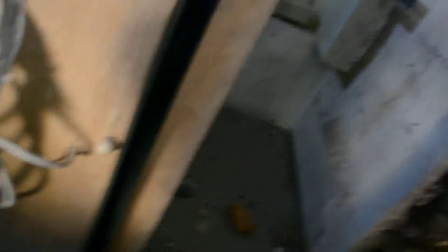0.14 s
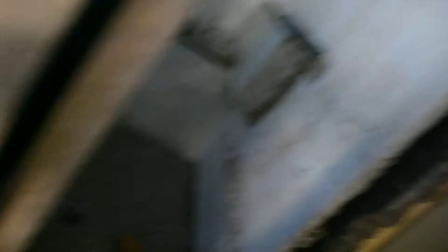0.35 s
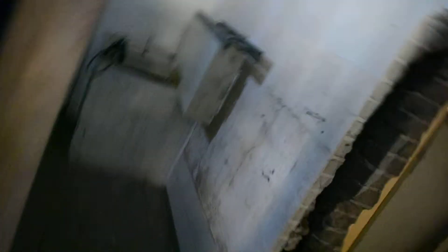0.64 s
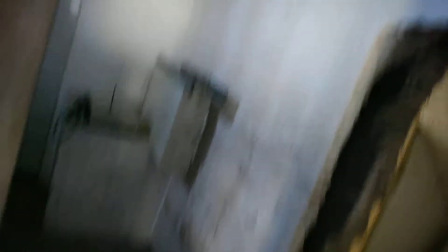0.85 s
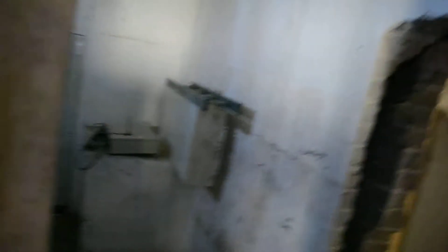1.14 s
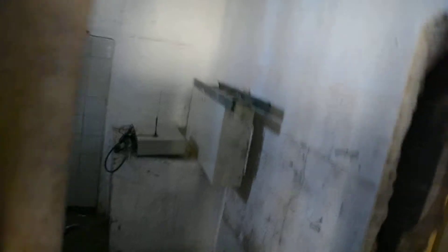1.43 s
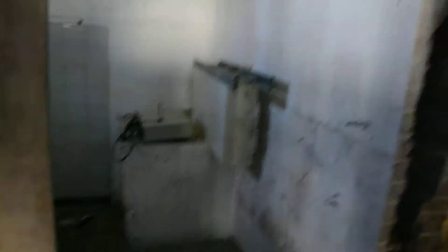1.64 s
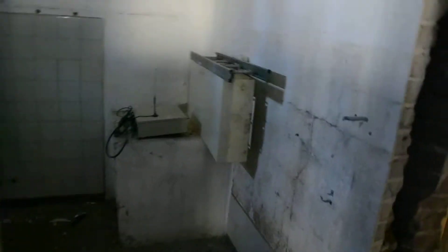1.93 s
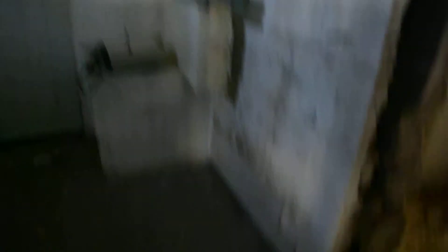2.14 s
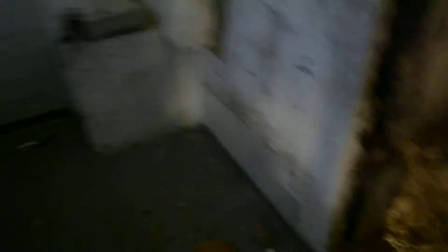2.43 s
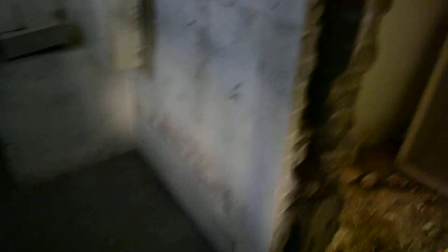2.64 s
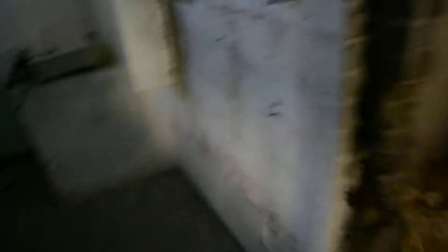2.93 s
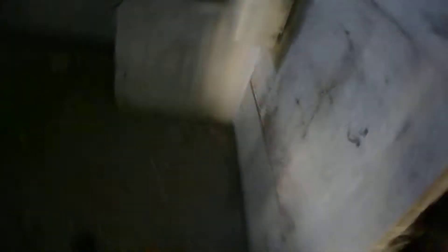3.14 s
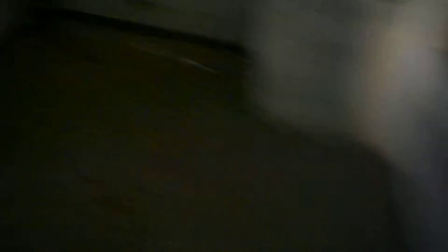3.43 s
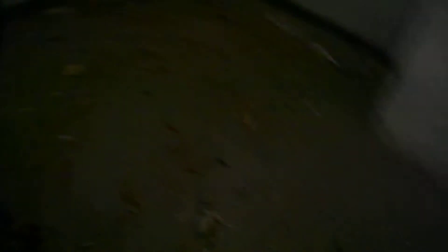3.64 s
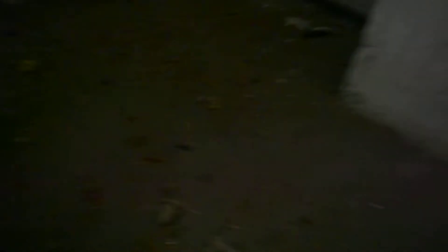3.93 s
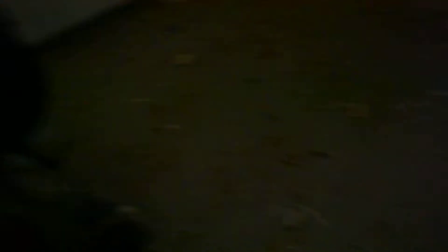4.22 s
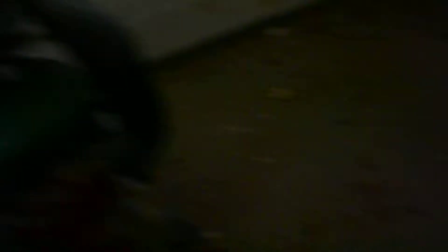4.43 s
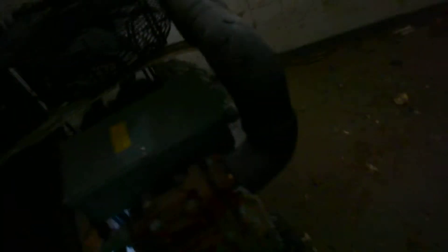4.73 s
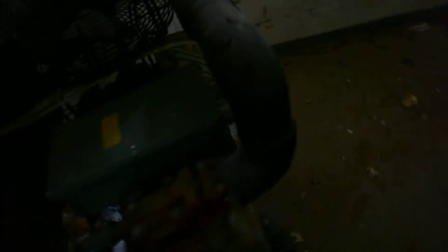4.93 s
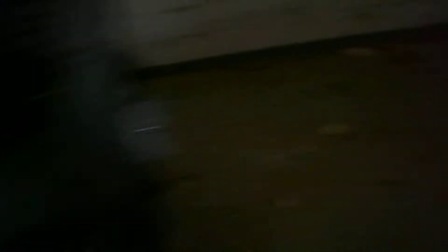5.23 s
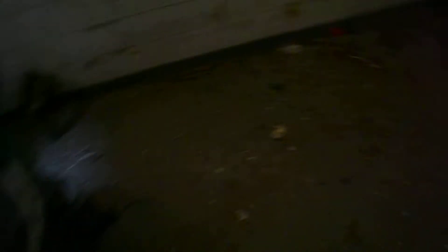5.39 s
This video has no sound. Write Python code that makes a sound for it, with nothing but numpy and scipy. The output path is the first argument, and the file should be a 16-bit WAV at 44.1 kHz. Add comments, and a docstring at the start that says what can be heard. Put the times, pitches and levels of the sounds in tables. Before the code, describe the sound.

Someone walks over grit and debris on a concrete floor. Light cracks lead into brisk crunches, snaps and small chinks, then stone knocks, and suddenly very loud crunches with heel thuds and a hollow ringing tumble. The bare walls answer with a short hard reverb. A lull follows, then a small knock and lighter scuffs; slightly dull handheld microphone, low steady air.

```python
"""The doorway of a small bare concrete room: someone steps through, soles crunching and scuffing over grit.
Noise and pitched cracks, coloured by pressure, make the crunch; short bursts ring broad humps as snaps and
knocks. Dying sines make the chinking metal, the ringing hollow piece and the heel thuds; slips rasp.
Random taps are the walls, whose answer swells as the walker enters and then sinks; steady air lies below."""
import sys
import numpy as np
from scipy import signal
from scipy.fft import rfft, irfft
from scipy.io import wavfile
from scipy.ndimage import uniform_filter1d

SR = 44100
rng = np.random.default_rng(int(sys.argv[2]) if len(sys.argv) > 2 else 0)


def persist_wave(psi):
    """Save psi, clipped to +-1, as 16-bit WAV."""
    counts = np.round(np.clip(psi, -1, 1) * 32767).astype(np.int16)
    wavfile.write(sys.argv[1], SR, np.atleast_2d(counts).T)


N = 245195
# All source levels are relative: the microphone colour comes after them.

# microphone response: f/Hz, level/dB
MIC = [(6500, -5), (7500, -6), (7950, -15), (8400, -4.5), (9500, -5.5), (10500, -11.5), (11400, -27)]


def gain_of(db):
    """Amplitude factor for a level in dB."""
    return 10 ** (np.asarray(db) / 20)


def evened(x):
    """Bring a signal to an RMS of 1."""
    return x / np.sqrt(np.mean(x ** 2) + 1e-20)


def read_curve(points, hz):
    """Read a frequency curve, straight between its points over log frequency."""
    f, value = np.transpose(points)
    return np.interp(np.log(hz + 1), np.log(f + 1), value)


def over_time(points, t):
    """Read a curve of (t/s, value) at the times t."""
    return np.interp(t, *np.transpose(points))


def add(mix, s, sound):
    """Mix a sound in at s seconds, cut at the end of the scene."""
    part = mix[round(s * SR):][:len(sound)]
    part += sound[:len(part)]


def ring(hz, db, t60, phase=0):
    """One dying mode: a sine that loses 60 dB in t60 seconds, cut after 1 s at most."""
    t = np.arange(int(SR * min(t60, 1))) / SR
    return gain_of(db - 60 * t / t60) * np.sin(2 * np.pi * hz * t + phase)


def softened(tone, rise_s):
    """Ramp the start of a tone in, as a contact that is not instant."""
    return tone * np.minimum(np.arange(len(tone)) / SR / rise_s, 1)


def slow_waver(samples):
    """Slow random movement with an RMS of 1: noise averaged twice over a window."""
    once = uniform_filter1d(rng.standard_normal(N), size=samples)
    return evened(uniform_filter1d(once, size=samples))


def hump(x, hz, width):
    """A broad two-pole resonance, width as a share of hz; output peak 1."""
    r = np.exp(-np.pi * width * hz / SR)
    out = signal.lfilter([1, 0, -1], [1, -2 * r * np.cos(2 * np.pi * hz / SR), r * r], x)
    return out / abs(out).max()


def swell(t, start, rise, fade, db):
    """Rise, then fade: returns the gain and how far the fade has gone (1 after one fade time)."""
    rise_bend, fade_db, fade_bend = 1.1, 35.5, 1.14  # fade_db is lost over one fade time
    up = np.clip((t - start) / max(rise, .001), 0, 1)
    gone = np.clip((t - start - rise) / max(fade, .01), 0, 3)
    gain = up ** rise_bend * gain_of(db - fade_db * gone ** fade_bend)
    return gain * (gone < 3), gone


def soles():
    """Pressure sets the crunch; fine grit lifts its treble, pebbles its middle, body weight its bass."""
    # spectrum of sole on grit: f/Hz, relative density/dB per Hz
    grit_curve = [(24, -69), (40, -73), (108, -37), (195, -2), (247, -6), (320, -1.5), (927, -3.5),
                  (1120, -2), (4010, -10), (5580, -15.5), (7240, -15), (10100, -17.5), (11300, -21.5),
                  (14700, -55), (22000, -120)]
    hz, t, z = signal.stft(grains(rate=1800., spread_db=2.0), SR, nperseg=512, noverlap=384)
    z /= np.sqrt((abs(z) ** 2).mean(1, keepdims=True)) + 1e-12  # flatten the grain spectrum
    fine_db, weight_db, pebbles_db = pressure(t)[1]

    high = np.clip(np.log2(hz / 2600 + 1e-9) / 0.84, 0, 1)[:, None]
    low = np.clip(np.log2(900 / (hz + 1)) / 2.09, 0, 1)[:, None]
    middle = np.exp(-(np.log2(hz / 2600 + 1e-9) / 0.66) ** 2)[:, None]  # pebbles clack around here
    colour_db = high * fine_db + low * weight_db + middle * pebbles_db
    shape = gain_of(read_curve(grit_curve, hz)[:, None] + colour_db)
    mid = (hz > 500) & (hz < 3000)
    shape /= np.sqrt((shape[mid] ** 2).sum(0))  # pressure then sets the level of this band

    patches = uniform_filter1d(rng.standard_normal(z.shape), size=5, axis=0)
    patches = uniform_filter1d(patches, size=14, axis=1)
    shape *= gain_of(1.6 * evened(patches))  # each bit of rubble favours other pitches for a moment
    crunch = signal.istft(z * shape, SR, nperseg=512, noverlap=384)[1][:N]
    step = np.arange(0, N, 32)
    force = np.sqrt(pressure(step / SR)[0])
    return np.interp(np.arange(N), step, force) * crunch


def grains(rate, spread_db):
    """Countless grains crack, each ringing in one of 24 bands, a few large, over a rubbing hiss."""
    # share of separate cracks in the crunch: t/s, power share/0-1
    crack_share = [(0, 0.85), (2.7, 0.76), (3.3, 0.21), (4.9, 0.02), (5.56, 0.64)]
    cracks = np.zeros(N)
    for hz in np.geomspace(120, 10500, 24):
        size = gain_of(spread_db * np.minimum(rng.exponential(1, N), 4))
        size *= rng.choice([-1, 1], N)
        chance = rate / 24 / SR * np.sqrt(hz / 1500)  # high bands crack more often
        train = size * (rng.random(N) < chance)
        band = signal.oaconvolve(train, ring(hz, 0, 31.0 / hz))[:N]
        cracks += evened(band) * np.sqrt(hz)
    share = np.clip(over_time(crack_share, np.arange(N) / SR), 0, 1)
    return np.sqrt(share) * evened(cracks) + np.sqrt(1 - share) * rng.standard_normal(N)


def pressure(t):
    """Power of all crunches together, and their colour mixed by each one's share of it."""
    # soles shifting lightly on the grit throughout: t/s, level/dB
    shuffle = [(0, -59), (.12, -61), (.45, -65), (.75, -61), (.99, -55.5), (1.07, -60), (1.35, -53),
               (1.8, -47.5), (2.3, -54), (2.75, -57), (3.15, -57.5), (3.9, -42), (4.12, -56), (4.3, -77),
               (4.85, -65), (4.91, -59.5), (5.2, -60), (5.56, -64.5)]
    # colour of that shifting: fine grit/dB, body weight/dB, pebbles/dB
    shuffle_colour = (0, 4, 0.34)
    # crunches and scuffs: start/s, rise/s, fade/s, pressure/dB, fine grit/dB, body weight/dB, pebbles/dB
    crunch_rows = [(.475, 0.011, 0.046, -54.5, -4, -11, -13), (.55, 0.052, 0.2, -61, -1, 11, 9),
                   (.672, .006, 0.24, -58, -2, 4, 0), (1.083, 0.0087, 0.18, -35, -2.5, -3, -2),
                   (1.119, 0.013, 0.011, -24, -12, -15, -7.5), (1.145, 0.014, 0.44, -44.5, 2.5, -3, 2),
                   (1.42, 0.082, 0.16, -42, 1.5, 4, -0.5), (1.52, 0.063, 0.21, -45.5, 8, 0, 11),
                   (1.69, 0.025, 0.16, -45, 5.5, -14, 0), (1.857, 0.056, 0.084, -37.5, 0, 7.5, 1),
                   (2.099, 0.015, 0.25, -42.5, -2, -1, -1), (2.452, 0.069, 0.17, -38.5, 1, 1, 5.5),
                   (2.579, 0.05, 0.097, -43, -2, -16, -9), (2.802, 0.0086, 0.2, -45.5, -5, -0.5, -4),
                   (2.94, 0.075, 0.11, -55, -6, -5, -9), (3.348, 0.032, 0.23, -18, 3, 1, 3),
                   (3.557, 0.031, 0.39, -16.5, 1, -20.5, 7.5), (3.63, 0.041, 0.32, -26, -3, -22, -11),
                   (3.786, 0.024, 0.19, -27.5, -12.5, -9, -16), (3.95, 0.021, 0.19, -49, 22, 0, -3),
                   (4.135, 0.017, 0.25, -56.5, 7.5, -5, -15), (4.25, 0.012, .12, -64.5, 20, -15, -11),
                   (5.003, 0.032, 0.29, -46.5, 10, 5.5, 5.5), (5.12, 0.025, 0.3, -47.5, 4.5, -20, 2.5),
                   (5.203, 0.0066, 0.085, -34.5, -9.5, -22, -0.5), (5.22, 0.038, 0.4, -42.5, 3.5, -5.5, 3)]
    dull_db = 16  # extra loss of the fine grit over one fade time
    power = gain_of(over_time(shuffle, t)) ** 2
    colour = power * np.array(shuffle_colour)[:, None]
    for start, rise, fade, db, fine_db, weight_db, pebbles_db in crunch_rows:
        gain, gone = swell(t, start, rise, fade, db)
        own_colour = np.array([fine_db - dull_db * gone, weight_db + 0 * t, pebbles_db + 0 * t])
        power = power + gain ** 2
        colour = colour + gain ** 2 * own_colour
    return power, colour / power


def snaps():
    """A break and its dying puff of splinters ring a broad resonance, with a bright edge."""
    # fragments snapping under a sole: t/s, resonance peak/dB, centre f/Hz, bright edge against it/dB
    snap_rows = [(0.197, -38.5, 3980, -18), (0.214, -39, 1880, -10), (0.275, -39, 2740, -14),
                 (0.349, -37, 1080, -2.5), (0.366, -32.5, 1310, -6), (0.385, -41, 1140, 2),
                 (0.437, -37, 1300, -4), (0.49, -37.5, 2020, 1), (0.58, -38.5, 603, -25),
                 (1.089, -26.5, 1240, -3), (1.127, -28, 880, -4), (1.159, -25, 930, -14),
                 (1.17, -15, 2820, -7), (1.195, -24, 1330, -16), (1.279, -26.5, 1260, -8),
                 (1.336, -34, 1210, 0), (1.398, -43.5, 3610, 10), (1.421, -29, 655, -6),
                 (1.438, -26.5, 633, 0), (1.529, -34, 636, 5), (1.558, -24.5, 990, -17),
                 (1.586, -25.5, 2700, 1.5), (1.625, -20.5, 1190, -28), (1.636, -23, 1190, -23),
                 (1.723, -26, 1050, 1.5), (1.77, -20.5, 1580, -9), (1.862, -26, 700, -24),
                 (1.906, -29.5, 910, -20), (1.915, -21.5, 850, -20), (1.943, -25.5, 620, -8),
                 (1.987, -29, 684, -1.5), (2.03, -29.5, 930, 2), (2.089, -26.5, 4020, -13),
                 (2.123, -31, 1030, 4), (2.2, -21.5, 2010, -30), (2.219, -22.5, 1030, -38),
                 (2.344, -41, 2200, 3), (2.363, -25, 990, -31), (2.39, -46, 840, 12),
                 (2.472, -27.5, 600, -22), (2.502, -25.5, 3600, -9), (2.519, -22, 703, 1),
                 (2.645, -26.5, 1470, -11), (2.724, -38.5, 694, 2), (2.803, -32.5, 1570, -32),
                 (2.976, -34, 423, -25), (3.448, -9.5, 1350, -24), (3.659, -10.5, 1860, 5.5),
                 (3.966, -37, 2050, 0), (5.29, -26, 1220, -8), (5.325, -27.5, 1050, -19),
                 (5.455, -37, 690, -27), (5.487, -37, 673, -6)]
    splinter_s = 0.0034  # the noise dies to about a third in this time
    out, t = np.zeros(N), np.arange(1024) / SR
    for s, db, hz, edge_db in snap_rows:
        puff, fizz = rng.standard_normal((2, 1024)) * np.exp(-t / splinter_s)
        puff[20] += 4.  # the break itself
        edge = gain_of(edge_db) * hump(fizz, 6550.0, width=1.0)
        add(out, s, gain_of(db) * (hump(puff, hz, width=0.4) + edge))
    return out


def knocks():
    """One sharp blow with a bright tick and a dull body; returns the direct sound and what fills the room."""
    # stones knocked against the floor: t/s, main peak/dB, centre f/Hz, width/share of centre,
    # then against the main peak: bright tick/dB, dull body/dB; and share sent to the walls/dB
    knock_rows = [(2.804, -27, 1530, 0.18, -30, -8.5, 5.5), (2.9865, -40, 10000, 0.36, -15, -30, -9),
                  (3.0225, -33, 8530, 0.53, -13, -25, 9), (3.1758, -18, 7800, 0.42, -12, -32, -11),
                  (3.175, -26, 1664, 0.8, -1.5, -7.5, 17), (3.343, -23, 3070, 0.19, -23, -27, -2),
                  (3.353, -21.5, 1580, 1, 10, 4, 17), (3.562, -6.5, 2230, 1, -22, -24, 4.5),
                  (4.572, -28.5, 1452, 0.16, -15, -3.5, 15.5), (4.5745, -29.5, 8000, 0.59, -7, -30, -14),
                  (5.207, -35, 1270, 0.49, -24.5, -8.5, 19.5)]
    near, far = np.zeros((2, N))
    strike = signal.unit_impulse(1024)
    for s, db, hz, width, tick_db, body_db, wall_db in knock_rows:
        blow = hump(strike, hz, width)
        blow += gain_of(tick_db) * hump(strike, 4400.0, width=3.8)
        blow += gain_of(body_db) * hump(strike, 520.0, width=2.1)
        # the stone and the nearest surfaces answer at once
        for late in np.r_[0, rng.uniform(.7, 8., 4) / hz]:
            add(near, s + late, gain_of(db) * rng.choice([-1, 1]) * blow)
        add(far, s, gain_of(db + wall_db) * blow)
    return near, far


def hollow():
    """Each blow lands elsewhere and favours the modes near one pitch; floor contact makes each mode waver."""
    # modes of the kicked hollow piece, some in close pairs: f/Hz, level/dB, t60/s
    hollow_modes = [(615, -6, .25), (733, -1, .4), (1394, -3, .35), (1410, -2, .6), (1535, -4, .6),
                    (1732, -5, .4), (1825, -4, .55), (2112, -4, .72), (2130, -6, .4), (2400, -7, .5),
                    (2880, -7, .5), (3330, -9, .5), (3600, -8, .3)]
    # blows as it tumbles: t/s, level/dB, f/Hz around which this blow rings most
    bumps = [(3.358, -25.5, 1410), (3.576, -17, 1820), (3.6, -25, 715), (3.66, -31, 730),
             (3.735, -19.5, 1340), (3.79, -24, 1370), (3.81, -29, 1830), (3.829, -47, 3300),
             (3.895, -33.5, 2070), (4.03, -47, 1370), (4.572, -54, 1440), (5.141, -46, 1300),
             (5.175, -44, 1320)]
    out = np.zeros(N)
    for hz, db, t60 in hollow_modes:
        mode = np.zeros(N)
        for s, blow_db, most_hz in bumps:
            off_db = 22 * abs(np.log2(hz / most_hz))  # 22 dB lost per octave away
            tone = ring(hz, blow_db + db - off_db, t60, rng.uniform(0, 2 * np.pi))
            add(mode, s, softened(tone, rise_s=0.001))
        out += mode * gain_of(3. * slow_waver(700))  # 3 dB RMS
    return out


def chinks():
    """Each metal part rings with its own modes, starting softly; one waver moves them all as they rock."""
    # small metal parts, one list of modes a part: f/Hz, level/dB, t60/s
    metal_parts = [
        [(7200, 2.2, 0.067), (7660, -17, 0.06)],
        [(3160, 11.5, 0.085)],
        [(3750, 9, 0.013), (6760, -5.5, 0.049), (7340, 0, 0.051), (8850, -14, 0.2)],
        [(2760, 9.5, 0.02), (3050, -2, 0.037)],
    ]
    # a further part with clear tones: f/Hz, level/dB, t60/s
    clear_part = [(4090, -2, .09), (4150, -6, .06), (8400, -1.5, .13), (9770, .1, .1)]
    # blows, one list a part, the clear one last: t/s, level/dB
    chink_blows = [
        [(1.224, -45), (1.241, -38), (1.256, -29.5), (1.293, -49), (1.323, -55), (1.359, -32.5), (1.68, -40),
         (1.712, -44)],
        [(1.468, -45), (2.803, -52)],
        [(2.501, -28), (2.53, -54)],
        [(4.117, -46), (4.134, -43.5), (4.175, -49), (5.487, -46.5)],
        [(1.193, -39.5), (1.79, -35), (1.845, -63), (2.123, -39.5), (2.805, -57)],
    ]
    out = np.zeros(N)
    for modes, blows in zip(metal_parts + [clear_part], chink_blows):
        for s, blow_db in blows:
            for hz, db, t60 in modes:
                tone = ring(hz, blow_db + db, t60, rng.uniform(0, 2 * np.pi))
                add(out, s, softened(tone, rise_s=0.0022))
    return out * gain_of(1.3 * slow_waver(150))  # 1.3 dB RMS


def thuds():
    """Heel blows on the slab: low dying modes with a soft start."""
    # heel on the slab: t/s, level/dB, f/Hz, t60/s
    thud_rows = [(1.1, -63, 62, 0.85), (2.807, -40.5, 395, 0.19), (3.353, -21.5, 187, .14),
                 (3.36, -41, 123, 0.34), (3.378, -17, 268, 0.21), (3.452, -26, 270, 0.18),
                 (3.455, -30.5, 79, 0.15), (3.46, -25, 156.4, 0.094), (3.5, -36, 125, 0.16),
                 (3.805, -30, 238, 0.16), (4.432, -62, 45, 0.098), (4.575, -42.5, 240, 0.14),
                 (8.8, -56, 113, .15), (5.487, -49, 177, 0.05)]
    out = np.zeros(N)
    for s, db, hz, t60 in thud_rows:
        add(out, s, softened(ring(hz, db, t60), rise_s=0.0021))
    return out


def drag():
    """Pieces shudder or rasp as they slide: uneven slips drive one resonance."""
    # slides: start/s, rise/s, fade/s, level/dB, f/Hz, width/share of f
    drag_rows = [(1.385, .01, 0.062, -47, 3600, .063), (2.11, 0.032, 0.11, -40.5, 636, 0.064),
                 (2.6, 0.042, .17, -51, 4420, 0.053), (2.95, 0.023, 0.18, -54, 3260, .15),
                 (4.48, .05, 0.086, -57, 2840, 0.061), (4.997, 0.013, 0.13, -43, 350, .28)]
    slips_per_s = 54.5
    out, t = np.zeros(N), np.arange(SR // 4) / SR
    for start, rise, fade, db, hz, width in drag_rows:
        slips = rng.standard_normal(len(t)) * (0.4 + np.cos(np.pi * slips_per_s * t) ** 4)
        rasp = evened(hump(hump(slips, hz, width), hz, 2 * width))
        add(out, start, swell(t, 0, rise, fade, db)[0] * rasp)
    return out


def room(x):
    """Wall echoes: sparse taps of random sign, each band dying at its own speed; three tails in turn."""
    # decay of the bare walls: f/Hz, t60/s
    wall_decay = [(100, 0.69), (500, 0.63), (1400, 0.65), (3700, 0.54), (9700, 0.34)]
    out, turn = np.zeros(N), np.arange(N) / SR * 2.311 * np.pi
    for k in range(3):
        taps = np.zeros(SR)
        at = np.arange(60, SR - 12, 12)
        taps[at + rng.integers(0, 12, len(at))] = rng.choice([-1., 1.], len(at))
        hz, t, z = signal.stft(taps, SR, nperseg=256)
        decay = gain_of(-60 * t / read_curve(wall_decay, hz)[:, None])
        tail = signal.istft(z * decay, SR, nperseg=256)[1]
        share = np.sqrt(2 / 3) * np.cos(turn + k * np.pi / 3)  # the three powers sum to 1
        out += signal.fftconvolve(x * share, tail / np.linalg.norm(tail))[:N]
    return out


def air():
    """The steady outdoor wash and hiss: noise shaped so that the microphone colour leads to its curve."""
    # spectrum behind the microphone: f/Hz, relative density/dB per Hz
    air_curve = [(15, -40), (25, -18), (199, -6), (387, 5.5), (812, 3), (1020, 3.5), (2040, 2.5),
                 (3580, -1.5), (7920, -13.5), (9010, -7.5), (11300, -27), (14700, -57), (22000, -120)]
    hz = np.fft.rfftfreq(N, 1 / SR)
    noise = rfft(rng.standard_normal(N)) * gain_of(read_curve(air_curve, hz) - read_curve(MIC, hz))
    return gain_of(-56.5) * evened(irfft(noise, N))  # RMS dB ahead of the microphone


def scene():
    """Sum the direct sounds, their answer from the walls, and the air."""
    # share of the direct sound that reaches the walls: t/s, level/dB
    wall_share = [(0, -9), (2.3, -5.5), (2.8, -3), (3.4, -7), (5.56, -9)]
    near, far = knocks()
    direct = soles() + snaps() + chinks() + hollow() + thuds() + drag()
    inside = gain_of(over_time(wall_share, np.arange(N) / SR))
    return (direct + near + room(inside * direct + far) + air())[None]


def record(dry):
    """Microphone colour with a dip near 8 kHz, then a band limit at 11.5 kHz."""
    hz = np.linspace(0, SR / 2, 513)
    colour = signal.firwin2(255, hz, gain_of(read_curve(MIC, hz)), fs=SR)
    coloured = signal.oaconvolve(dry, colour[None], "same")
    band_limit = signal.firwin(511, 11500, window=("kaiser", 9), fs=SR)
    return signal.oaconvolve(coloured, band_limit[None], "same")


dry = scene()
out = record(dry)
persist_wave(out)
```